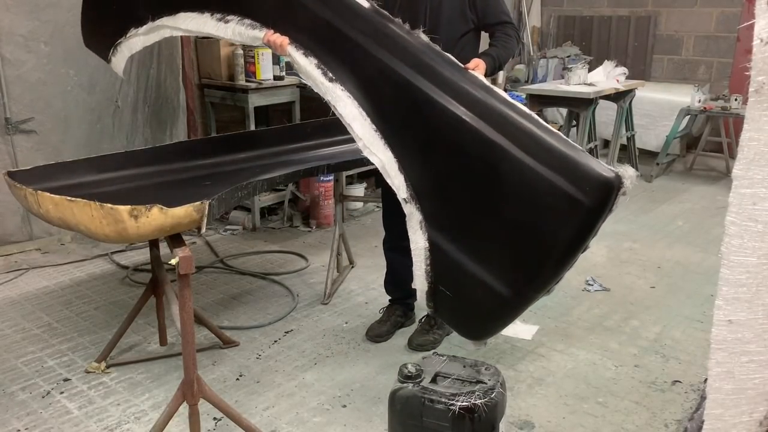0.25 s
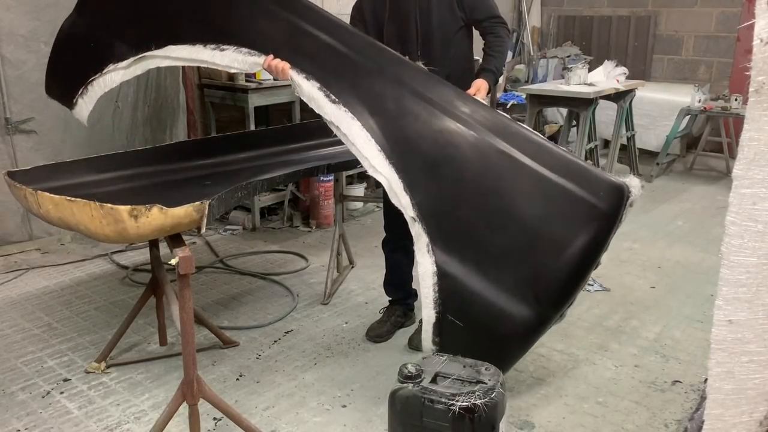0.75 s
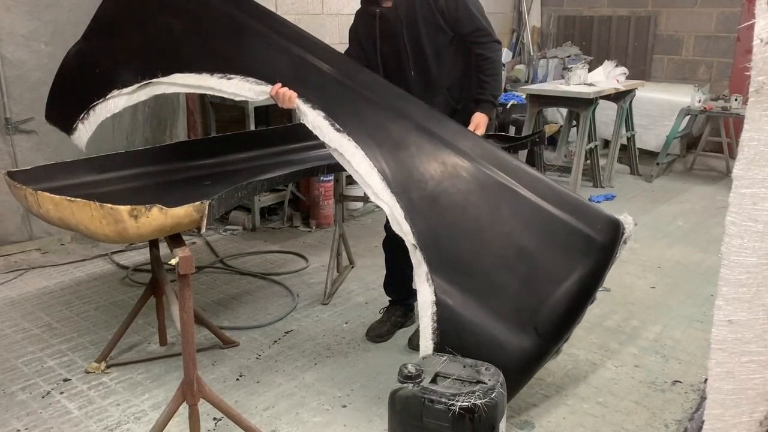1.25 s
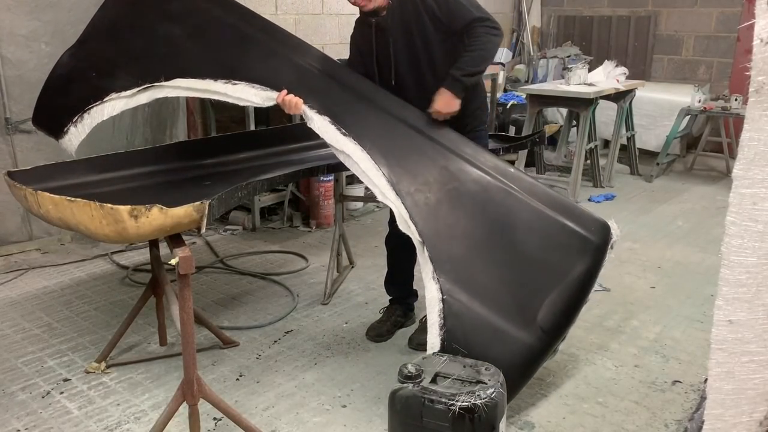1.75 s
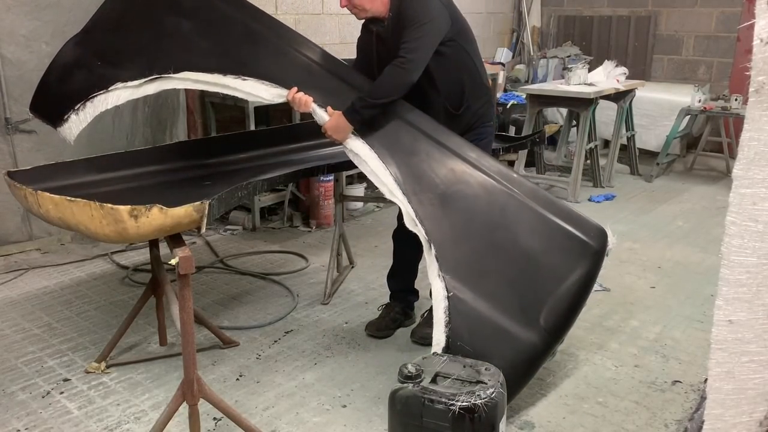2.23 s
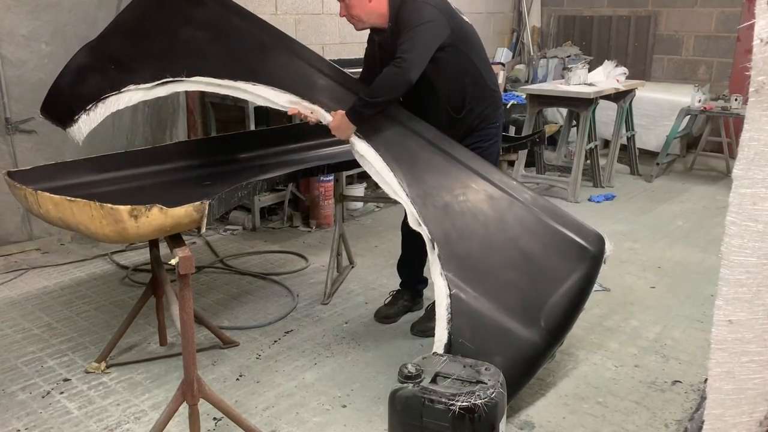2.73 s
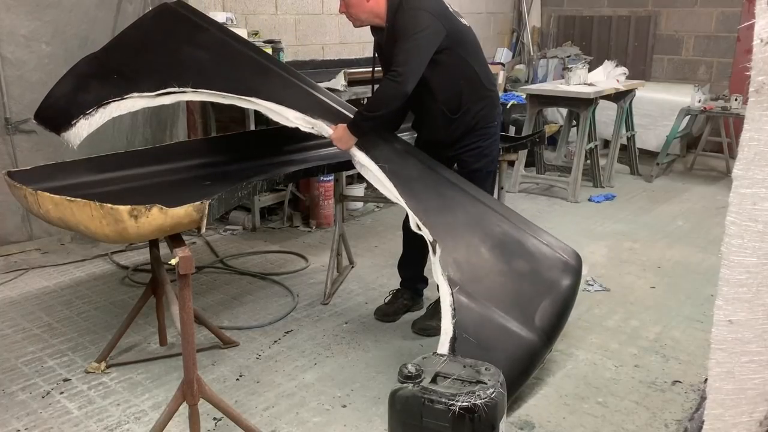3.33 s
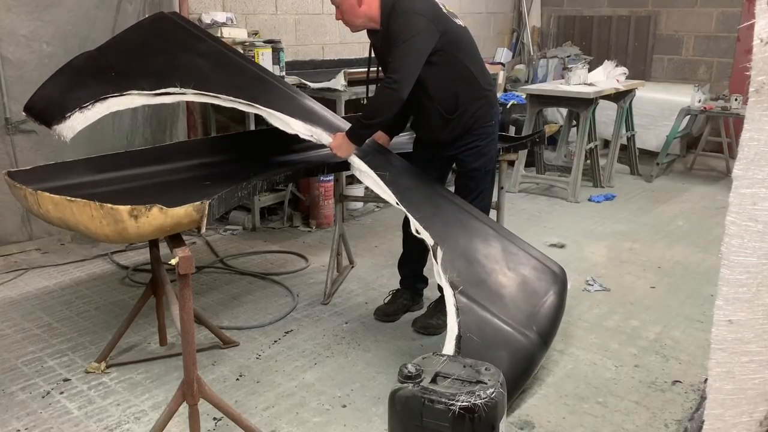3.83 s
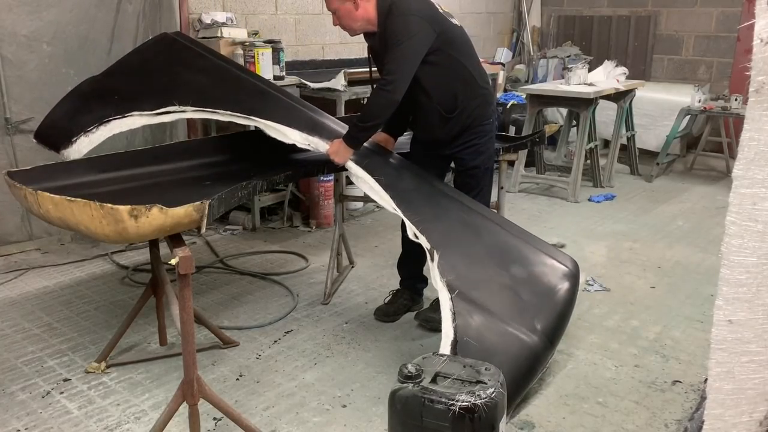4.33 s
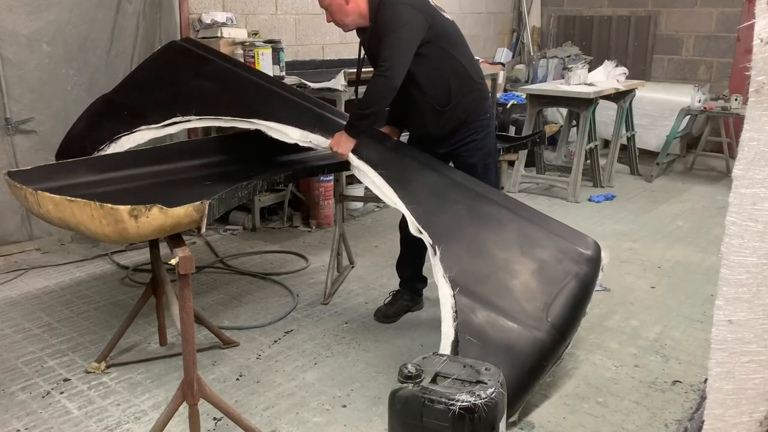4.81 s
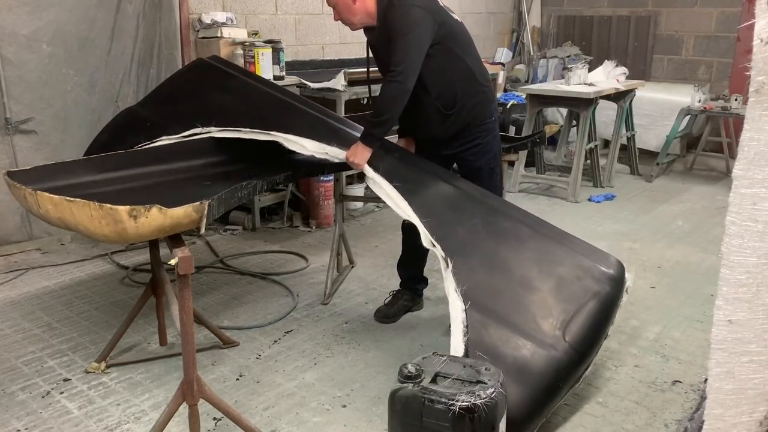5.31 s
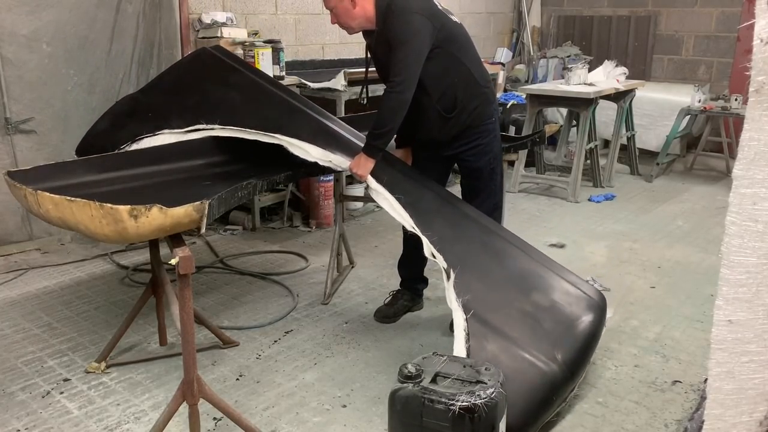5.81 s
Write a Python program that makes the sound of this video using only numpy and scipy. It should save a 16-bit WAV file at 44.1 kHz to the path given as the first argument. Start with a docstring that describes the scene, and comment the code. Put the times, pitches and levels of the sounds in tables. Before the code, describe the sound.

A stereo pair stands in a hard-walled workshop with short, lively reverberation and faint still air. For the first second there is only a soft, deep wobble of a large thin panel, dull handling rustle and barely audible hiss. At about 1.15 s the bond starts to give: crunchy, brittle snaps and dry crackle, a short scrape, a sharp crack at 1.4 s and a hard hollow double knock near 1.67 s. From 2 to 3.8 s scattered clicks and snaps come in small clusters, with tiny rough squeaks and light panel bumps. Between 4.05 and 4.7 s the cracking is densest and loudest, peaking around 4.3 s. From 4.85 to 5.2 s the panel drags in short, low, juddering groans. Further rubs and crackles follow, with dull thumps around 5.56 to 5.65 s, a sharp click at 5.85 s and a last snap and bump at 6 s.

```python
"""Sharp snaps and dry crackle, squeaks, hollow knocks and a low groan in a hard-walled workshop:
a fibreglass wing is flexed and peeled out of its mould, heard by two microphones in the room.
The bond lets go in snaps, each with a run of tiny fractures; stick-slip makes the edges squeak and scrape.
The big thin panel wobbles in its two lowest modes, bumps the mould and groans as it drags over the rim.
Faint short swells of hiss, handling rustle and the still air of the workshop lie behind."""
import sys
import numpy as np
from scipy import signal
from scipy.fft import rfft, irfft, next_fast_len
from scipy.io import wavfile
from scipy.ndimage import uniform_filter1d, map_coordinates

SR = 44100
rng = np.random.default_rng(int(sys.argv[2]) if len(sys.argv) > 2 else 0)


def bounce(signal):
    """Save signal as a 16-bit WAV file at the path given by the first command-line argument."""
    frames = np.transpose(np.atleast_2d(signal))
    limited = np.clip(frames, -1, 1)
    pcm = np.round(limited * 32767).astype(np.int16)
    wavfile.write(sys.argv[1], SR, pcm)


N = 267271

# All levels are relative, ahead of any layer gain, the room and the overall colour.
# Tears, a snap and its run of fractures: [t/s, level/dB, body/dB from level, spit/dB from level,
# decay/s, snap/dB from its run, pitch of the spot f/Hz]
TEARS = [(1.1607, -27.5, -6.5, -14, 0.019, -13.5, 3900), (1.205, -24.5, -6.5, 4.5, 0.01, -13, 2010),
         (1.232, -28.5, -6, 5, .046, -7, 2050), (1.286, -41, 9, -9, .012, 5, 1560),
         (1.420, -19.5, -17.5, -19.5, 0.011, 0, 6400), (1.485, -24, -18, -28, 0.0094, -16.5, 4060),
         (1.5412, -28.5, -14, -4, 0.034, -17, 4500), (1.662, -30.5, -1.5, 5, .005, 24, 3970),
         (1.684, -34, -0.5, 0.5, 0.0038, 12, 4240), (1.816, -52, 5.5, 24, 0.013, 27, 4450),
         (2.062, -37, -16, -17, 0.034, -6.5, 14000), (2.2056, -38.5, -36, -1.5, .011, 14, 8900),
         (2.2945, -28.5, -20, -0.5, .017, 5.5, 7180), (2.507, -34.5, -7.5, 8.5, 0.034, -7.5, 10400),
         (2.553, -33.5, -8, -17, .03, -3, 5240), (2.596, -38, -0.5, -5, 0.024, -5, 5280),
         (2.632, -35.5, -10.5, -3.5, 0.024, -1.5, 4800), (2.7039, -27.5, -40, -3.5, .018, -5, 4660),
         (2.9356, -28, -18, -11, 0.031, 4, 8700), (3.134, -41.5, -27, -22, 0.012, 12, 9250),
         (3.2, -33.5, -28, -14, 0.011, 10, 10200), (3.221, -23, -20.5, -0.5, 0.028, -6, 11000),
         (3.418, -36, -19, 2, .011, 21, 10100), (3.436, -28, -35, -8.5, 0.022, 13, 3400),
         (3.4614, -22.5, -32.5, -9, 0.036, 2, 3314), (3.612, -25, -20, -10, 0.0028, 2, 6300),
         (3.6712, -25.5, -24, 5, 0.038, -11, 4540), (3.7242, -25.5, -15, 4.5, 0.0099, -10, 12900),
         (4.047, -38, -16, 5, 0.0295, -9, 12840), (4.067, -35, -5, -11, 0.004, -9.5, 10400),
         (4.084, -31, -5, -13.5, 0.041, 7.5, 10500), (4.151, -33, -12, -17, .045, 6, 704),
         (4.201, -29.5, -22, -2.5, .024, 5, 7450), (4.3152, -13, -25.5, -4, 0.01, 3, 9300),
         (4.346, -21, -11, -18.5, 0.015, 6, 12400), (4.391, -23, -10, 3, .009, 3.5, 5670),
         (4.440, -18, -18.5, -23.5, 0.0048, -1.5, 6290), (4.511, -38.5, -13, -22, .0074, 1, 13900),
         (4.598, -32, -10.5, -8, 0.01, 9, 6160), (4.698, -36.5, -4.5, 2.5, 0.026, -12, 6350),
         (5.3189, -34, -9.5, -22, .02, -7, 2270), (5.358, -27, -9, -8, 0.03, -7.5, 10360),
         (5.38, -23.5, -10.5, -20, 0.013, 4, 10500), (5.466, -34, 1, -6.5, .018, 19, 5280),
         (5.523, -34.5, -9, -8, .014, 5.5, 4240), (5.619, -29.5, -1, 3, .03, 3.5, 1900),
         (5.787, -43.5, -3.5, 4, 0.016, 0, 4770), (5.8118, -38.5, -11, -5.5, .013, -5, 9000),
         (5.833, -31, -14, -12, .03, 0, 14000), (6.018, -26, -16, -19, 0.022, -18, 4000)]
# Frequency bands of a tear, in the order body, crack, fizz, spit: [low f/Hz, high f/Hz]
TEAR_BANDS = [(480, 2660), (1950, 13200), (7900, 21700), (11900, 19700)]
# How a snap reaches each of those bands; slow low waves arrive spread out:
# [band gain/dB, added snap level/dB, spread t/s]
SNAP_BANDS = [(-6, 2, 0.003), (-5.5, 5, 0.002), (-12, 11.5, 0.0006), (-8, 6, 0.0004)]
CRACK_DB, CRACK_FOLLOWS = -2.5, 0.41  # crack from the tear's level; more body cracks harder (dB per dB)
STUTTER_S, STUTTER_LOSS_DB = 0.0017, 4  # steps of a snap: mean spacing, loss from step to step
RUN_RATE, RUN_SCATTER_DB = 400, 5  # in a tear's run: fractures a second, scatter of their sizes
RISE_S, LAZY_DB = 0.0063, 12  # build-up scale of a run, slower the further its snap falls below it

# Pulls that keep the bond crackling: [t/s, length t/s, level/dB, body/dB from level]
PULLS = [(1.169, 0.19, -40.5, -4), (1.42, 0.29, -44.5, -6), (1.9, 0.17, -48.5, -8), (2.51, 0.22, -46, -7),
         (2.866, 0.14, -43.5, -4), (3.432, 0.21, -45.5, -9), (3.597, 0.14, -47.5, 0.5),
         (4.108, 0.61, -38.5, -4.5), (4.301, 0.25, -40.5, -12.5), (4.563, 0.29, -51.5, 1),
         (5.361, 0.07, -39, -1.5), (5.52, 0.029, -37.5, -2.5), (5.824, 0.28, -43, -5.5)]
# Strain on the bond until the panel comes free, never quiet: [t/s, length t/s, level/dB]
STRAIN = (1.17, 3.72, -53.5)
STRAIN_BODY_DB = -7  # from the strain's level
PULL_ATTACK_S, PULL_RELEASE_S = 0.017, 0.084
FIBRE_RATE, FIBRE_SCATTER_DB = 90, 4.5  # under a pull: broad fractures a second, scatter of their sizes
CLUMP_DB = 3.6  # unevenness of the crackle

# Single sharp clicks among the tears: [t/s, peak level/dB]
TICKS = [(1.1435, -37), (1.5513, -26), (1.7928, -25), (1.816, -28.5), (2.0462, -38), (2.1033, -23.5),
         (2.264, -34), (2.4034, -45), (2.6806, -20), (2.6878, -36), (2.87, -30), (2.8805, -26),
         (2.954, -18), (3.138, -40), (3.5478, -21.5), (3.699, -26), (3.864, -36.5), (4.004, -30),
         (4.0843, -31), (4.1454, -31.5), (4.193, -18), (4.512, -15), (4.7514, -28), (4.872, -24),
         (5.582, -22.5), (5.8485, -17), (5.9125, -49)]
# Range of the clicks' pitches and their band, capped near the top of the sampled range: [low f/Hz, high f/Hz]
TICK_BAND = (2900, 31000)
TICK_SPREAD_S = 0.0007

# Edges that stick and slip: [t/s, pitch f/Hz, level/dB, length t/s, waver/share of pitch, sag/share of pitch]
SQUEAKS = [(1.905, 2980, -55.5, 0.041, 0.057, 0.051), (1.907, 4820, -59, 0.05, 0.02, 0.051),
           (2.209, 2250, -41.5, 0.011, 0.02, 0.095), (2.206, 8730, -39.5, 0.0114, 0.077, 0.12),
           (2.287, 4240, -56, 0.015, .03, 0.24), (2.296, 1795, -46, 0.013, 0.11, 0.019),
           (2.282, 4700, -60, 0.015, 0.057, 0.083), (2.511, 2330, -41.5, 0.01, 0.089, 0.038),
           (2.595, 1980, -37, 0.0056, 0.091, 0.24), (2.637, 1623, -44, 0.0217, 0.078, 0.18),
           (2.941, 2277, -41, 0.024, 0.039, 0.18), (3.133, 1510, -52, 0.014, 0.037, 0.075),
           (3.277, 2155, -59, 0.0204, 0.06, -0.23), (3.417, 2296, -47, 0.011, 0.077, 0.13),
           (3.466, 2185, -45, 0.0129, 0.055, 0.28), (4.314, 2345, -41, 0.013, 0.049, 0.22),
           (4.442, 1555, -30.5, 0.007, 0.11, 0.22), (4.443, 2235, -34.5, 0.024, 0.11, 0.12)]
# Edge sliding along the flange: [t/s, length t/s, level/dB, from f/Hz, to f/Hz]
SCRAPES = [(1.267, 0.094, -43, 1650, 758), (1.41, 0.026, -47, 1255, 2100), (4.26, 0.075, -44, 1297, 2484),
           (5.44, .05, -50, 1235, 2164), (5.614, 0.089, -45, 2100, 1046)]
# Panel chattering against the mould: [t/s, level/dB, chatter decay t/s, contact pitch f/Hz]
BUMPS = [(1.209, -37.5, 0.022, 187), (1.289, -39, 0.018, 286), (2.597, -41, 0.06, 714),
         (2.94, -47.5, 0.015, 704), (2.991, -45.5, 0.0092, 700), (3.275, -52, 0.011, 744),
         (3.467, -51, 0.016, 753), (3.615, -62, 0.028, 820), (4.076, -45.5, .03, 480),
         (4.152, -42, 0.0097, 576), (4.385, -38, 0.024, 324), (4.442, -38.5, 0.086, 350),
         (4.597, -44.5, 0.016, 182.5), (4.632, -46, .012, 810), (5.384, -39, 0.013, 447),
         (5.45, -41.5, 0.023, 705), (5.632, -35, .015, 319), (5.697, -44, 0.013, 342),
         (6.02, -43, 0.085, 648)]
# Modes of the panel: [f/Hz, width f/Hz, level/dB]
PANEL_MODES = [(133, 26.3, 3.5), (164, 37, -1), (210, 11, 1), (245.8, 9.9, -0.5), (263, 37, -4),
               (339, 57, -5.5), (390, 39, -4), (455, 46, -9), (493, 22, -6.5), (653, 78, -9.5),
               (780, 110, -14.5), (970, 33, -14), (1146, 28, -20), (1466, 140, -21), (1704, 55, -15.5)]
# Solid landings: [t/s, thump f/Hz midway in its glide, thump level/dB, its decay t/s, clack level/dB, its decay t/s]
THUDS = [(1.21, 196, -35.5, 0.013, -38, 0.013), (1.287, 284, -36.5, .014, -34.5, 0.022),
         (1.654, 238, -41, .006, -35, .008), (1.6627, 208, -22.5, 0.018, -18.5, 0.015),
         (1.685, 270, -22.5, 0.012, -22, 0.014), (2.595, 300, -46, 0.014, -31, 0.0043),
         (2.635, 330, -50, .008, -38.5, 0.015), (3.011, 330, -52, .008, -40, 0.0098),
         (3.275, 210, -46.5, 0.0065, -47, 0.0053), (3.612, 215, -48.5, 0.011, -39, 0.01),
         (4.441, 230, -39.5, .01, -43, 0.011), (5.033, 260, -34, 0.0071, -49.5, 0.0044),
         (5.453, 398, -38, .006, -39, .006), (5.497, 450, -39, .006, -42, .006),
         (5.557, 254, -20.5, 0.0057, -38, 0.0032), (5.575, 304, -25, 0.0099, -53.5, 0.0055),
         (5.621, 340, -37, 0.0092, -28.5, 0.012), (5.649, 195, -29, 0.012, -34.5, 0.0052)]
# Spectrum of the clack: [f/Hz, level/dB per Hz]
CLACK = [(80, -13), (150, -4), (300, -1), (450, -1.5), (720, -6), (900, -3.5), (1000, -7), (1190, 1.5),
         (1500, -0.5), (1750, -10.5), (1950, -17), (2200, -33), (3500, -43)]
THUD_ROOM_DB, THUD_NEAR_DB = -3.5, -9  # into the room, straight to the microphones

# Short strokes of the flange over the rim: [t/s, length t/s, judder level/dB, rasp level/dB]
DRAGS = [(4.852, 0.021, -31.5, -39.5), (4.87, 0.02, -31, -30.5), (4.898, 0.026, -23.5, -30.5),
         (4.956, 0.06, -26.5, -30.5), (5.035, .014, -26.5, -28.5), (5.053, 0.024, -31.5, -34),
         (5.077, 0.02, -34, -34), (5.121, 0.14, -31, -49.5), (5.325, 0.0091, -34, -36),
         (5.367, 0.067, -39.5, -35.5), (5.454, 0.07, -42.5, -35.5), (5.514, .03, -29.5, -36),
         (5.6, 0.11, -33, -39), (5.724, 0.035, -31, -44.5)]
DRAG_ATTACK_S, DRAG_RELEASE_S, JUDDER_HZ = 0.0026, 0.019, 127.7
# Pushes that ring the main bending mode: [t/s, length t/s, level/dB, pitch f/Hz]
FLEXES = [(-.1, 0.099, -36, 89), (0.07, 0.39, -32.5, 90), (0.458, 0.45, -35.5, 90.5),
          (1.232, 0.3, -39.5, 92.5), (1.624, 0.11, -39.5, 83), (1.864, 0.099, -41.5, 92),
          (2.11, 0.6, -43, 96.5), (2.604, 0.46, -38, 96.5), (3.124, 0.26, -39.5, 95.5),
          (3.921, 0.51, -40, 93), (4.556, 0.47, -47.5, 87), (5.47, 0.38, -46.5, 82)]
SWAY_ATTACK_S, SWAY_RELEASE_S = 0.027, 0.16
# Shakes that set the loose end flapping slowly: [t/s, length t/s, level/dB]
FLAPS = [(.15, 0.12, -42), (.6, 0.4, -45.5), (1.16, 0.22, -40), (1.8, 0.13, -41.5), (2.28, 0.52, -48.5),
         (2.65, 0.45, -41), (3.27, 0.14, -44), (3.74, 0.29, -36.5), (4.12, 0.19, -39.5), (4.39, 0.27, -40),
         (5.47, 0.096, -35.5), (5.72, 0.51, -45.5)]
FLAP_ATTACK_S, FLAP_RELEASE_S, FLAP_WAVER_DB = 0.044, 0.077, 1.8
# Faint short swells of hiss, two leading into louder sounds: [t/s, length t/s, level/dB, centre f/Hz]
HISSES = [(0, 0.014, -55, 3530), (0.107, 0.14, -70, 3920), (0.358, 0.016, -62, 10100),
          (1.125, 0.033, -52.5, 4970), (5.282, .03, -60, 6000)]

# Spectrum of the handling rustle: [f/Hz, level/dB per Hz]
RUSTLE = [(70, 5), (120, 8), (170, -4), (280, -1.5), (580, -12), (1000, -13.5), (1400, -18.5),
          (2000, -34.5), (3500, -64.5)]
# Spectrum of the still air: [f/Hz, level/dB per Hz]
AIR = [(20, -37), (33, -8.5), (50, -0.5), (110, 1), (300, -17), (1000, -34.5), (2500, -37.5), (7000, -52.5),
       (9000, -45), (16000, -44)]
# Reverberation time of the workshop: [f/Hz, t60 t/s]
WALLS = [(100, 0.72), (500, 0.44), (1400, 0.27), (4000, 0.43), (9000, 0.29), (15000, 0.11)]
# Direct sound against reverberant: [f/Hz, level/dB]
DIRECT = [(100, 6.5), (1000, -5.5), (4000, -6.5), (9000, -5.5), (13000, 2)]
# Likeness of left and right in the diffuse sound: [f/Hz, correlation]
ALIKE = [(100, 0.94), (300, 0.74), (600, 0.57), (1200, -0.077), (2500, -0.088), (5000, 0.1), (9000, -0.12),
         (14000, 0.4)]
# Left-right balance, right over left: [f/Hz, level/dB]
TILT = [(60, 3), (130, 2), (300, -1), (2000, -2), (4500, -1), (9000, 3), (13000, 0)]
# Overall colour of the sound, with a gap near 11.5 kHz: [f/Hz, level/dB]
COLOUR = [(100, -0.5), (2400, -3), (3300, -2), (7400, -0.5), (8400, 5), (10000, 0), (10800, -8),
          (11300, -26.5), (11800, -22), (12600, -5), (14500, -11.5), (15300, -17.5), (16300, -42)]
TOP_HZ = 16500  # band limit


def tearing():
    """Each tear starts with a snap and runs on along the bond, heard in four bands."""
    force = np.zeros((len(TEAR_BANDS), N))
    for s, fizz_db, body_db, spit_db, decay, snap_db, hz in TEARS:
        rise = RISE_S * (1.5 + max(-snap_db, 0) / LAZY_DB)
        crack_db = CRACK_DB + CRACK_FOLLOWS * body_db
        levels_db = fizz_db + np.array([body_db, crack_db, 0, spit_db])
        for track, db, (gain_db, edge_db, spread_s) in zip(force, levels_db, SNAP_BANDS):
            tear = burst(decay, snap_db + edge_db, RUN_RATE, RUN_SCATTER_DB, spread_s, rise)
            add(track, s, amp(db + gain_db) * spot(tear, hz))
    return sum(band(x, edges) for x, edges in zip(force, TEAR_BANDS))


def burst(decay, snap_db, rate, scatter_db, spread_s, rise=RISE_S):
    """One snap, then a run of smaller ones that builds and dies, with the energy of 40 ms at rms 1."""
    t = np.arange(SR // 5) / SR
    envelope = np.exp(-t / max(decay, 0.001)) * (1 - np.exp(-t / rise))
    run = fractures(len(t), rate, scatter_db) * envelope
    run /= np.linalg.norm(run) + 1e-9
    add(run, 0, amp(snap_db) * snap(spread_s))
    return run / np.linalg.norm(run) * np.sqrt(0.04 * SR)


def snap(spread_s, count=3):
    """A snap gives way in a few quick, uneven steps, each weaker than the last; energy 1."""
    out = np.zeros(SR // 40)
    for k in range(count):
        start = STUTTER_S * k * rng.uniform(0.7, 1.3)
        add(out, start, amp(-STUTTER_LOSS_DB * k) * smear(spread_s))
    return out / np.linalg.norm(out)


def smear(decay):
    """Bending waves spread a snap in time, differently on every call; energy 1."""
    t = np.arange(SR // 80) / SR
    ring = rng.standard_normal(len(t)) * np.exp(-t / decay)
    return ring / np.linalg.norm(ring)


def fractures(n, rate, scatter_db):
    """Random impulses of uneven size, rate a second on average, rms 1."""
    size_db = scatter_db * np.clip(rng.standard_normal(n), -2, 2)
    size = amp(size_db) * rng.choice([-1, 1], n)
    return unit(size * (rng.random(n) < rate / SR))


def spot(x, hz, ring_db=1, sharpness=7):
    """Each spot of the laminate favours a pitch of its own."""
    b, a = signal.iirpeak(min(hz, SR / 2 - 100), sharpness, fs=SR)
    return x + amp(ring_db) * signal.lfilter(b, a, x)


def peeling(gains_db=(-1, -1.5, -1.5, -5), fibres_db=-3):
    """Under each pull the bond crackles in small clumps; some fibres snap broadly, some in one band only."""
    clumps = amp(CLUMP_DB * wander(55))
    broad = fractures(N, FIBRE_RATE, FIBRE_SCATTER_DB)
    body, crack, fizz = effort(1), effort(CRACK_FOLLOWS), effort()
    out = np.zeros(N)
    for load, edges, db in zip((body, crack, fizz, fizz), TEAR_BANDS, gains_db):
        own = fractures(N, rate=560, scatter_db=7.0)
        crackle = clumps * unit(broad + amp(fibres_db) * own)
        out += amp(db) * load * band(crackle, edges)
    return out


def effort(body_share=0):
    """How hard the panel is pulled; with a body share of 1, how hard that drives the low crackle."""
    loads = list(PULLS) + [(*STRAIN, STRAIN_BODY_DB)]
    rows = [(s, length, db + body_share * body_db) for s, length, db, body_db in loads]
    return swells(rows, PULL_ATTACK_S, PULL_RELEASE_S)


def ticks(gain_db=3):
    """Single sharp clicks among the tears: short noise bursts, each with a pitch of its own."""
    out = np.zeros(N)
    for s, db in TICKS:
        click = spot(smear(TICK_SPREAD_S), rng.uniform(*TICK_BAND), ring_db=-16)
        click = band(click, TICK_BAND, order=2)
        add(out, s, amp(db + gain_db) * click / abs(click).max())
    return out


def squeaks(rough_db=3, overtone_db=-14, gain_db=6):
    """Short, rough stick-slip tones that glide as the strain changes."""
    out = np.zeros(N)
    t = np.arange(SR // 6) / SR
    jitter = lambda: unit(uniform_filter1d(rng.standard_normal(len(t)), size=40))
    for s, hz, db, length, waver, sag in SQUEAKS:
        glide = sag * (np.exp(-t / length) - 0.5)
        phase = 2 * np.pi * np.cumsum(hz * (1 + waver * jitter() + glide)) / SR
        swell = (1 - np.exp(-t / 0.0011)) * np.exp(-(t / length) ** 2)
        tone = np.sin(phase) + amp(overtone_db) * np.sin(2 * phase)
        add(out, s, amp(db + gain_db) * swell * unit(amp(rough_db * jitter()) * tone))
    return out


def scrapes(width_hz=230):
    """An edge slides along the flange: a narrow, grainy rasp that glides as the free span changes."""
    out = np.zeros(N)
    low_pass = signal.butter(2, width_hz, fs=SR, output="sos")
    for s, length, db, from_hz, to_hz in SCRAPES:
        n = int(max(length, 0.01) * SR)
        grain = signal.sosfilt(low_pass, rng.standard_normal((2, n)))
        phase = 2 * np.pi * np.cumsum(np.geomspace(from_hz, to_hz, n)) / SR
        rasp = unit(grain[0] * np.cos(phase) + grain[1] * np.sin(phase))
        add(out, s, amp(db) * np.sin(np.pi * np.arange(n) / n) * rasp)
    return out


def bumps():
    """The panel lands on the mould and chatters briefly; each contact favours modes around its pitch."""
    out = np.zeros(N)
    for s, db, decay, hz in BUMPS:
        force = burst(decay, snap_db=2.5, rate=740, scatter_db=-10.0, spread_s=0.0016)
        force = np.pad(force, (0, SR // 5))  # room to ring on
        ring = band(panel(force), (hz / 1.41, hz * 2.85), order=2)
        add(out, s, amp(db) * ring * np.linalg.norm(force) / np.linalg.norm(ring))
    return out


def panel(force):
    """The force rings the panel's modes; the power of a white input is kept."""
    def response(f):
        total = 0
        for k, (centre, width, db) in enumerate(PANEL_MODES):
            damping = 1j * f * width
            total = total + (-1) ** k * amp(db) * damping / (centre ** 2 - f * f + damping)
        return total / np.sqrt(np.mean(abs(total) ** 2))
    return filtered(force, response)


def thuds(rise=0.00046, stiffen=0.12):
    """A solid landing: a damped thump, sharp while the skin is dented, and a clack of shaped noise."""
    out = np.zeros(N)
    t = np.arange(SR // 5) / SR
    for s, hz, thump_db, thump_decay, clack_db, clack_decay in THUDS:
        dent = np.exp(-t / thump_decay)
        thump_hz = hz * (1 + stiffen * (dent - 0.5))
        thump = dent * np.sin(2 * np.pi * np.cumsum(thump_hz) / SR)
        noise = filtered(rng.standard_normal(len(t)), lambda f: amp(along(CLACK, f)))
        clack = np.exp(-t / clack_decay) * unit(noise)
        add(out, s, (1 - np.exp(-t / rise)) * (amp(thump_db) * thump + amp(clack_db) * clack))
    return out


def dragging(judder_gain_db=-1, rasp_gain_db=-4, soft_hz=800):
    """Soft, uneven slips on the rim: a rasp in the panel's lower modes, and a low judder."""
    judder_rows = [(s, length, db) for s, length, db, _ in DRAGS]
    rasp_rows = [(s, length, db) for s, length, _, db in DRAGS]
    judder = swells(judder_rows, DRAG_ATTACK_S, DRAG_RELEASE_S)
    stroke = swells(rasp_rows, DRAG_ATTACK_S, DRAG_RELEASE_S)
    slips = fractures(N, rate=620, scatter_db=5.0) * unit(amp(1.6 * wander(36)))
    slips = signal.sosfilt(signal.butter(N=6, Wn=soft_hz, fs=SR, output="sos"), slips)
    rasp = panel(amp(rasp_gain_db) * stroke * slips)
    turns = np.cumsum(JUDDER_HZ * (1 + 0.0205 * wander(30))) / SR
    return rasp, amp(judder_gain_db) * judder * np.sin(2 * np.pi * turns)


def wobbling(flap_hz=62, bend_db=0.0, flap_db=0.0):
    """The two lowest modes of the sheet swell as it is bent; the upper one glides from push to push."""
    start, length, _, pitch = np.transpose(FLEXES)
    bend_hz = np.interp(np.arange(N) / SR, start + length / 2, pitch)

    def mode(hz, drift):
        turns = np.cumsum(hz * (1 + drift * wander(16))) / SR
        return np.sqrt(2) * np.sin(2 * np.pi * turns)

    bend = swells([row[:3] for row in FLEXES], SWAY_ATTACK_S, SWAY_RELEASE_S) * mode(bend_hz, drift=0.0161)
    flap = swells(FLAPS, FLAP_ATTACK_S, FLAP_RELEASE_S) * mode(flap_hz, drift=0.0588)
    bend_gain = amp(bend_db + 1.8 * wander(11.0))
    flap_gain = amp(flap_db + FLAP_WAVER_DB * wander(13))
    return bend_gain * bend + flap_gain * flap


def faint_hisses(width=1.56, gain_db=-3):
    """Faint short swells of hiss: band-limited noise, two of them leading into louder sounds."""
    out = np.zeros(N)
    for s, length, db, hz in HISSES:
        hiss = band(rng.standard_normal(N), (hz / width, hz * width), order=2)
        out += swells([(s, length, db + gain_db)], attack=0.014, release=0.0073) * hiss
    return out


def background(air_db=-50, hold_db=-55, carry_db=-43, settle_s=0.9, pull_db=-2):
    """Dull handling rustle, dying down as the panel is lowered and rising with each pull, over still air."""
    def noise(shape):
        pair = filtered(rng.standard_normal((2, N)), lambda hz: amp(along(shape, hz)))
        return unit(spread(pair))

    lowering = amp(carry_db) * np.exp(-np.arange(N) / SR / settle_s)
    handling = amp(hold_db) + lowering + amp(pull_db) * effort(1.0)
    return amp(air_db) * noise(AIR) + handling * noise(RUSTLE)


def workshop(x, lag=0.00002, build=0.0028, count=4):
    """Direct sound plus tails that trade places as the source moves about the panel."""
    hz, t, z = signal.stft(rng.standard_normal((count, 2, SR * 2 // 3)), SR, nperseg=256)
    t60 = along(WALLS, hz)[:, None]
    tails = signal.istft(z * amp(-60 * t / t60) / np.sqrt(t60), SR, nperseg=256)[1]
    tails *= 1 - np.exp(-np.arange(tails.shape[-1]) / SR / build)
    shares = np.array([wander(14) for _ in tails])
    shares /= np.linalg.norm(shares, axis=0)
    wet = np.zeros((2, N))
    for share, tail in zip(shares, tails):
        tail = tail / np.linalg.norm(tail[0])
        wet += signal.oaconvolve((x * share)[None], tail, axes=1)[:, :N]

    def direct_path(hz):
        # the direct sound reaches the right microphone earlier by the lag in s
        return amp(along(DIRECT, hz)) * np.exp(1j * np.pi * hz * lag * np.array([[-1], [1]]))

    return filtered(x, direct_path) + spread(wet)


def spread(pair):
    """Two unrelated noises become a diffuse field, alike in the bass."""
    turn = lambda hz: np.arccos(np.clip(along(ALIKE, hz), -1, 1)) / 2
    mid, side = filtered(pair, lambda hz: np.array([np.cos(turn(hz)), np.sin(turn(hz))]))
    return np.array([mid + side, mid - side])


def swells(rows, attack, release):
    """Gain over time: each (s, length, dB) row rises, holds and dies away; the loudest counts."""
    t = np.arange(N) / SR
    gains = []
    for s, length, db in rows:
        rise = 1 - np.exp(-np.maximum(t - s, 0) / attack)
        gains.append(amp(db) * rise * np.exp(-np.maximum(t - s - length, 0) / release))
    return np.max(gains, axis=0)


def amp(db):
    """Decibels to gain."""
    return 10 ** (np.asarray(db) / 20)


def unit(x):
    """x at rms 1."""
    return x / np.sqrt(np.mean(x ** 2) + 1e-20)


def along(points, hz):
    """(Hz, value) points read on a log frequency axis."""
    f, v = np.transpose(points)
    return np.interp(np.log(hz + 1), np.log(f + 1), v)


def wander(rate):
    """A smooth random curve, rate knots a second."""
    knots = rng.standard_normal(int(N * rate / SR) + 4)
    return map_coordinates(knots, [np.arange(N) * rate / SR])


def add(track, s, x):
    """Mix x into the track from time s."""
    part = track[..., max(round(s * SR), 0):][..., :x.shape[-1]]
    part += x[..., :part.shape[-1]]


def filtered(x, response):
    """x times a response of frequency."""
    n = x.shape[-1]
    m = next_fast_len(n + 8192)  # padded so that ringing does not wrap round
    return irfft(rfft(x, m) * response(np.fft.rfftfreq(m, 1 / SR)), m)[..., :n]


def band(x, edges, order=3):
    """Causal band-pass that keeps the power of a white input."""
    lo, hi = np.clip(edges, 1, SR / 2 - 1)
    sos = signal.butter(order, [lo, hi], "band", fs=SR, output="sos")
    return signal.sosfilt(sos, x) * np.sqrt(SR / 2 / (hi - lo))


def scene():
    """The sounds in the room, with landings, judder and wobble also straight to the microphones."""
    rasp, judder = dragging()
    landings = thuds()
    strikes = tearing() + peeling() + ticks() + squeaks() + scrapes() + bumps()
    in_room = workshop(strikes + amp(THUD_ROOM_DB) * landings + rasp + faint_hisses())
    near = amp(THUD_NEAR_DB) * landings + judder + wobbling()
    return in_room + near + background()


def record(dry):
    """Overall colour and left-right balance, then the band limit."""
    sides = np.array([[-0.5], [0.5]])  # left, right
    coloured = filtered(dry, lambda hz: amp(along(COLOUR, hz) + along(TILT, hz) * sides))
    return filtered(coloured, lambda hz: hz < TOP_HZ)


dry = scene()
out = record(dry)
bounce(out)
```